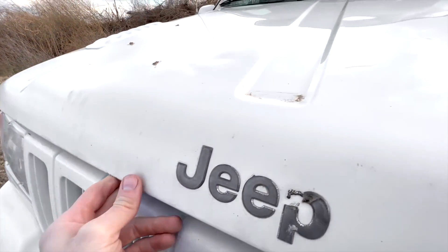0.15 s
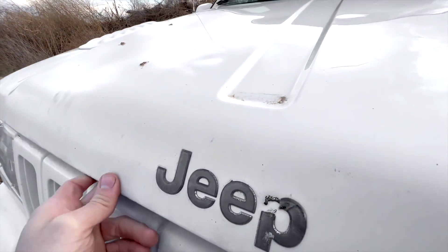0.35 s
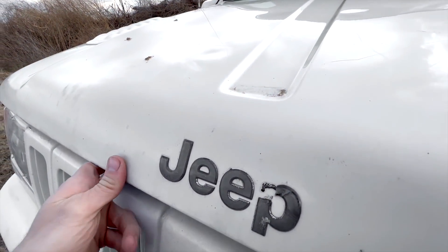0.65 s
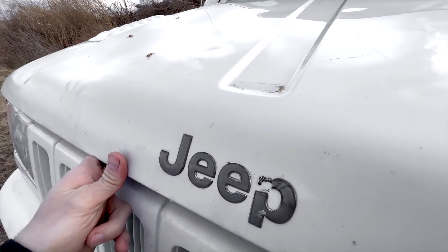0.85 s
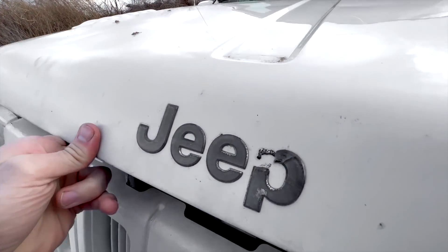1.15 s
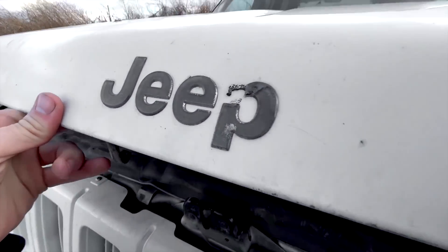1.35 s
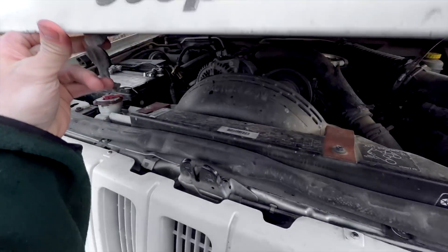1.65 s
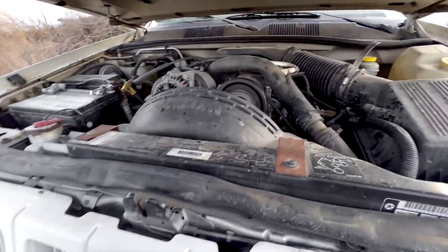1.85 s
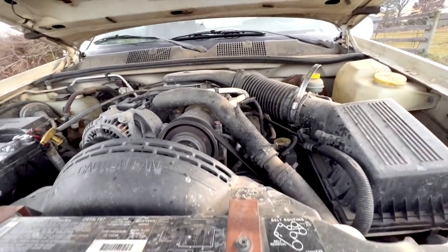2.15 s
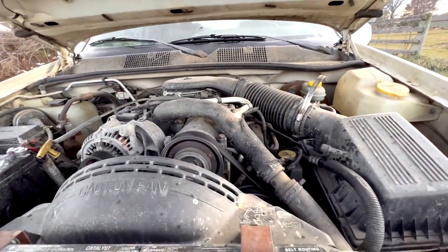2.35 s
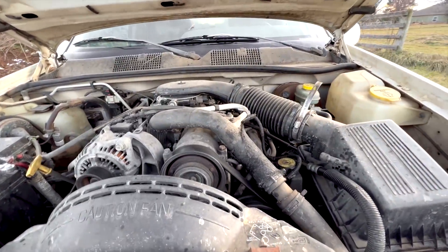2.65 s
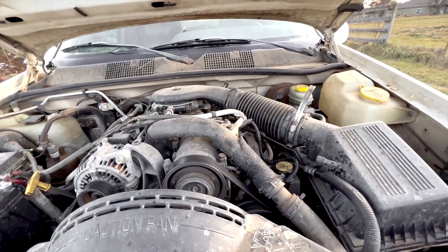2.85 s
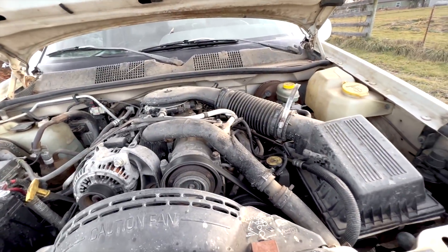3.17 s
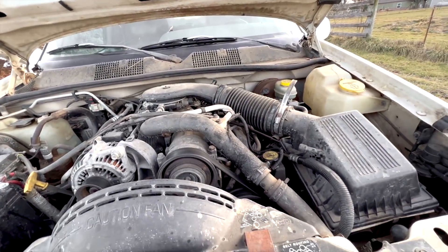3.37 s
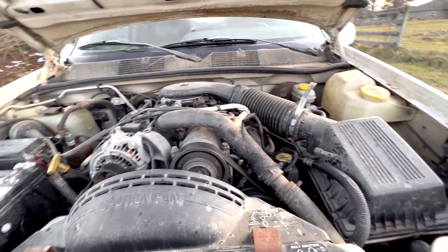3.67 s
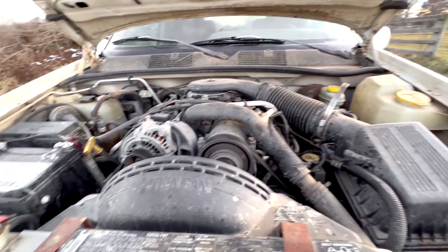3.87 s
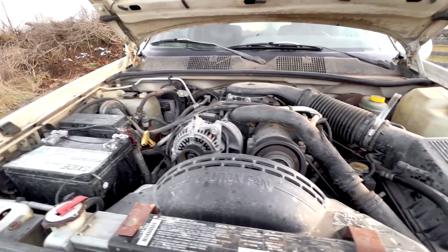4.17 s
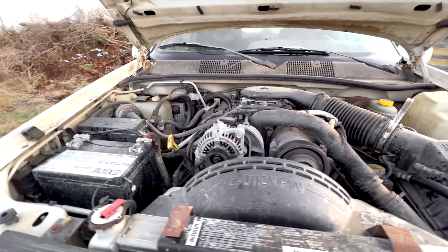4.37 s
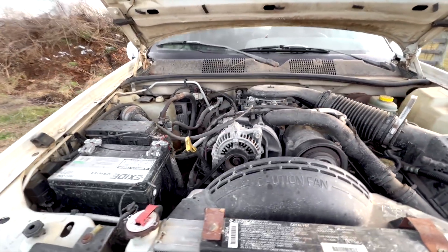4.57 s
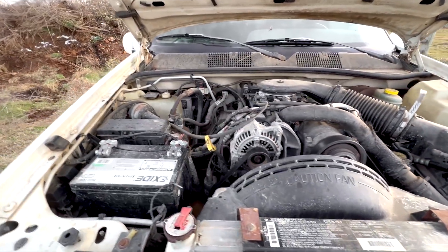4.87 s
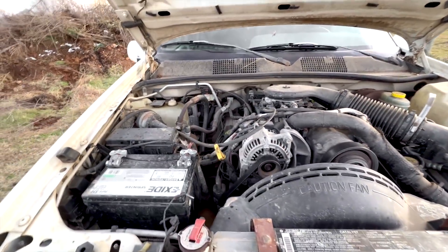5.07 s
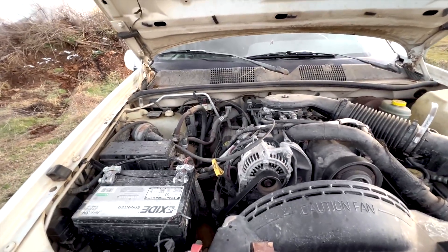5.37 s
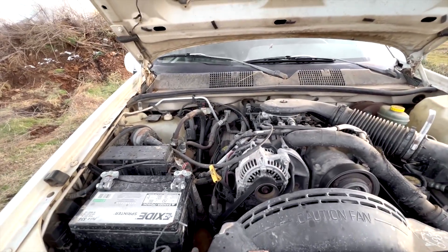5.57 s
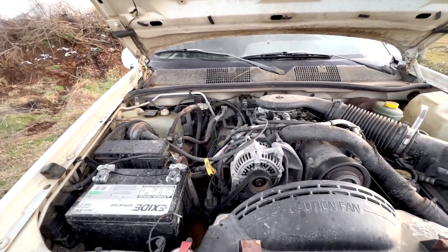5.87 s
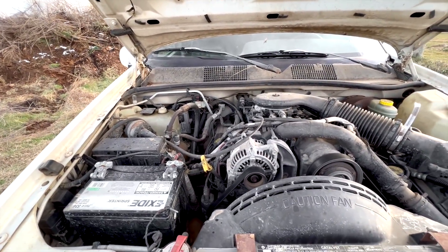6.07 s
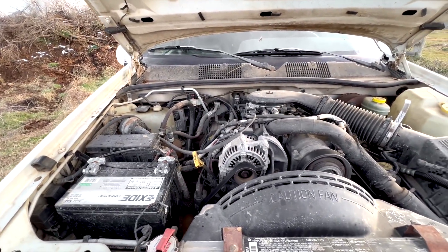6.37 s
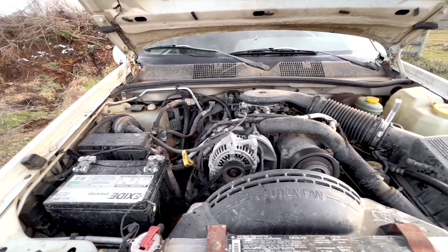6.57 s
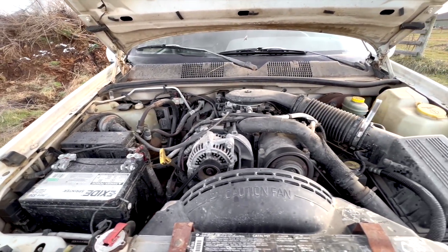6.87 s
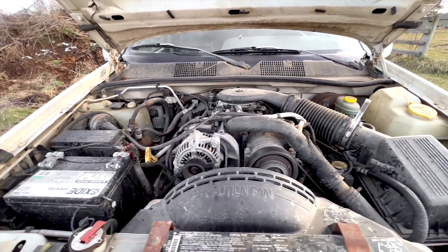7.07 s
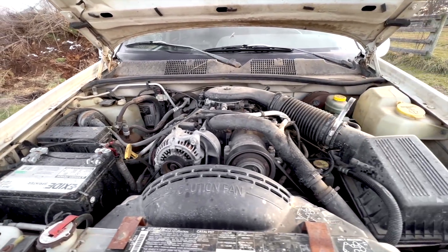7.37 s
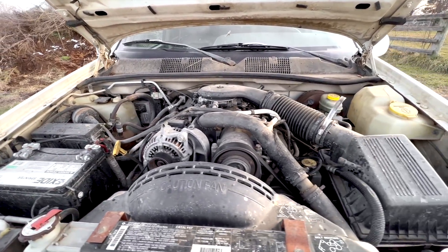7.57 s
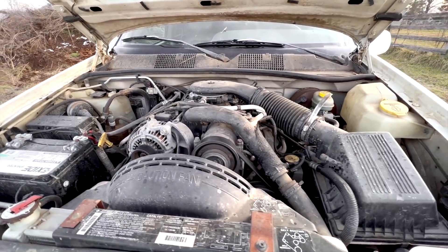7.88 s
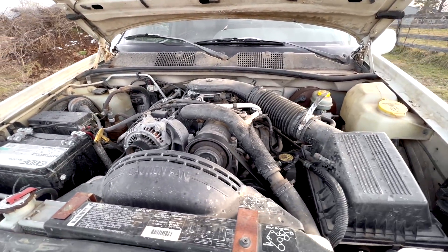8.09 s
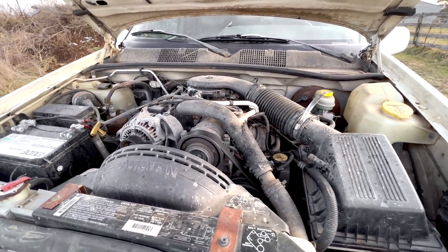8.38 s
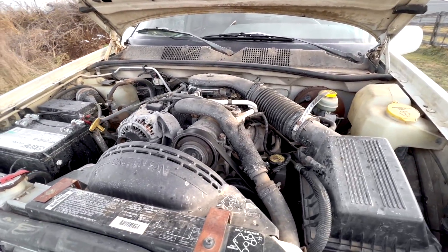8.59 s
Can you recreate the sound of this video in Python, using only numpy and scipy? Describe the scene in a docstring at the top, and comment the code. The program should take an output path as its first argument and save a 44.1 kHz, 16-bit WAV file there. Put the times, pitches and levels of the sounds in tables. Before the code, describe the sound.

A big petrol engine idles with an uneven lope while a worn belt squeals constantly and a bonnet catch clunks and squeaks open.

```python
"""In a field, a petrol V8 idles, heard from in front of the grille while its bonnet is unlatched and raised.
The exhaust lopes as uneven firing pulses ring pipes and block; noise throbbing with the engine gives fan,
covers and rumble. A worn drive belt squeals without pause as a wavering tone over gritty hiss, and its
scuffed patches come round with every lap. It hoots, chirps and ticks besides.
The catch squeaks as short tones and clunks as padded knocks that ring the bonnet sheet."""
import sys
import numpy as np
from scipy import signal
from scipy.fft import rfft, irfft, next_fast_len
from scipy.io import wavfile

SR = 44100
rng = np.random.default_rng(int(sys.argv[2]) if len(sys.argv) > 2 else 0)


def master(y):
    """Save y as 16-bit WAV."""
    cut = np.clip(np.atleast_2d(y).T, -1, 1)
    pcm = np.round(cut * 32767)  # scale
    wavfile.write(sys.argv[1], SR, pcm.astype(np.int16))


N = 384993   # length in samples

# The idle hunts a little. Each row: time in seconds, crank speed in rpm.
IDLE_SPEED = [(0, 691.7), (.57, 713.3), (1.28, 703.0), (4.07, 709.1), (4.44, 699.3), (6.48, 706.2),
              (8.73, 700.5)]
# Likeness of the two channels in every noise. Each row: frequency in Hz, correlation (held within -1 to 1).
CHANNEL_LIKENESS = [(60, 0.61), (130, 1), (290, 0.76), (640, 0.38), (1400, -0.031), (3100, -0.11),
                    (8000, -0.38), (9900, -0.11), (11600, -0.26), (12700, 1), (14000, -2.7), (15300, .1)]

# Cylinders in firing order. Each row: relative pulse level in dB, how early the pulse arrives
# as a share of the bank lead (0 = far bank, 1 = near bank).
CYLINDERS = [(14.5, 1), (17.5, 0.113), (11, 0.82), (-3.5, 0.4), (12.5, 0.0069), (16, 0.9), (17.5, 0.18),
             (9.5, 0)]
FIRST_FIRING_CYCLES, BANK_LEAD_CYCLES = .779, .027   # in engine cycles
# Exhaust pipe resonances. Each row: frequency in Hz, width in Hz, relative level in dB.
PIPE_MODES = [(63.52, 5.63, 2), (85.9, 5.33, 1.5), (141.5, 3, -11), (155.2, 4.2, -19.5)]
# Engine block resonances. Each row: frequency in Hz, width in Hz, relative level in dB.
BLOCK_MODES = [(245, 4.3, 2.5), (354, 57, -1), (394, 8, 3.5), (446.5, 5, 9)]

# Where in each cycle the engine shakes its mounts hardest.
# Each row: place in cycles, half width in cycles, relative strength.
MOUNT_SHAKES = [(.155, 0.072, 0.67), (.36, 0.033, 1.4), (.88, 0.051, 0.3)]
# Colour of the block rumble. Each row: frequency in Hz, relative level in dB.
RUMBLE_COLOUR = [(20, -10), (40, 3.5), (110, 3), (160, 4.5), (210, -8), (270, -8.5), (330, -7), (480, -9.5),
                 (700, -32.5), (1500, -52)]
# Colour of the fan and valve gear. Each row: frequency in Hz, relative level in dB.
WHIRR_COLOUR = [(200, -31), (450, 3.5), (650, -0.5), (900, 0.5), (1300, 2), (1800, -3), (2500, -9.5),
                (3500, -15), (6000, -30), (15000, -34.5)]
# Resonances of fan shroud and engine covers. Each row: frequency in Hz, width in Hz, relative level in dB.
COVER_MODES = [(393, 79, 7), (452, 65, 9), (792, 51, 2.5), (1091, 16, 9), (1293, 33, 8.5), (1557, 44, 3.5)]
# less of the rumble from the grille arrives as the microphone rises over the engine
RUMBLE_DB, RUMBLE_LOSS_DB = -27.5, 11
RISE_START_S, RISE_LENGTH_S = 1.92, 3.7

BELT_LAPS, PULLEY_TURNS = .2482, 2.423   # per engine cycle
# Where the belt sets its free span hooting. Each row: place in laps, half width in laps, relative level in dB.
HOOT_PLACES = [(0.031, 0.048, -6), (0.188, 0.019, -4), (.49, 0.012, -11), (.55, .028, -0.5),
               (0.687, 0.022, -8), (0.814, 0.01, -8), (0.924, 0.019, -11.5)]
# Sharp ticks of the belt catching. Each row: time in seconds, onset level in dB before the noise shapes it.
BELT_TICKS = [(0.841, -17), (4.224, -14), (4.277, -15), (5.343, -16.5), (5.603, -11), (6.975, -9.5),
              (7.15, -39), (8.157, -14)]

# Knocks of hand and catch on the bonnet. Each row: time in seconds, blow strength in dB before padding.
BONNET_KNOCKS = [(.798, -18.5), (1.192, -22), (1.214, -18), (1.368, -14.5), (1.383, -13.5), (1.402, -21),
                 (1.718, -23), (1.91, -20), (1.935, -23), (3.044, -24)]
# Bonnet sheet modes. Each row: frequency in Hz, relative level in dB, t60 in seconds.
SHEET_MODES = [(185, -13, .12), (242, -7, .14), (322, -9, .14), (410, -3, .17), (452, -3, .16),
               (520, -10, .08), (640, -20, .05), (1120, -14, .08), (1545, -13, .05)]
# Dry squeaks of catch and hinges. Each row: time in seconds, half length in seconds,
# centre pitch in Hz, fundamental in dB and octave in dB before the reflections.
CATCH_SQUEAKS = [(1.193, 0.0043, 1800, -39, -27), (1.331, 0.0054, 1823, -30, -25.5),
                 (1.362, 0.011, 1830, -27.5, -17), (2.391, 0.0086, 1548, -32, -56.5),
                 (2.472, .013, 1452, -30.5, -55)]
# the shut bonnet holds back the belt's hiss until it is lifted
LIFT_START_S, LIFT_LENGTH_S, BONNET_LOSS_DB = 1.04, 0.65, 9.5

# Worn patches along the belt. Each row: place in laps, nominal half width in laps,
# nominal scuff in dB, nominal fall of squeal pitch in Hz.
WORN_PATCHES = [(0.018, .014, 11.5, 337), (.091, 0.032, -1, 304), (.173, .0085, 13.5, 620),
                (0.206, .012, -2, 289), (0.294, 0.0076, 7.5, 402), (.352, .012, -9, 192),
                (0.394, 0.014, 5.5, 431), (0.464, 0.018, 4.5, 423), (.521, .016, 12, 298),
                (.559, .014, -2, 281), (.63, .012, 6, 356), (0.671, .007, 12.5, 560.2),
                (0.734, .018, 2.5, 310), (.791, .009, 6, 425), (.84, .014, -18, 193), (.897, .008, 11, 550),
                (0.921, .015, -4.5, 249), (0.967, .021, 1.5, 337)]
# Colour of rubber rubbing on steel. Each row: frequency in Hz, relative level in dB.
RUB_COLOUR = [(2000, -38), (3000, -3), (3800, -7.5), (4800, -1), (5500, -14), (5900, -39), (6500, 15),
              (7500, 2), (8800, 4), (10000, -19), (11200, 4.5), (13100, -1), (14200, 4.5), (15700, -20)]
# How far the rubbing leans left. Each row: frequency in Hz, left minus right in dB.
RUB_LEAN = [(3000, 1), (4200, -1), (5500, 18), (6700, 12), (7800, 12), (9000, -6), (15000, 2.5)]
# Resonances of the pulleys. Each row: frequency in Hz, width in Hz, relative level in dB.
PULLEY_MODES = [(4025, 300, -10.5), (4540, 580, -7.5), (5180, 180, -11), (5340, 92, -7), (6670, 960, -22),
                (12210, 310, -6.5)]
# The squeal swells and slackens. Each row: time in seconds, level in dB before the trim.
SQUEAL_LEVEL = [(0.0, -28.5), (1.29, -25.5), (1.34, -20), (2.84, -20.5), (3.4, -24), (6.15, -20.5),
                (7.07, -26.5), (7.1, -22.5), (8.73, -23.5)]
SQUEAL_TRIM_DB = -1.12

PEAK_LIMIT, CUTOFF_HZ = .92, 15750   # where rounded peaks level off, before the treble cut


def from_db(db):
    """Turn dB into an amplitude factor."""
    return 10 ** (np.asarray(db) / 20)


def rms_one(x):
    """Scale to an rms of 1."""
    return x / np.sqrt(np.mean(x ** 2) + 1e-20)


def in_time(rows):
    """Each column of a curve, sample by sample."""
    s, *columns = np.transpose(rows)
    return [np.interp(np.arange(N) / SR, s, c) for c in columns]


def at_hz(points, hz):
    """Read a spectrum on a log-frequency axis."""
    points = np.array(points)
    return np.interp(np.log(hz + 1), np.log(points[:, 0]), points[:, 1])


def fading(start_db, loss_db_per_s):
    """A level in dB that sinks at a steady rate."""
    return start_db - loss_db_per_s * np.arange(N) / SR


def travel(start_s, length_s):
    """How far a steady movement has got, from 0 to 1."""
    return np.clip((np.arange(N) / SR - start_s) / length_s, 0, 1)


def lean(left_db):
    """Left and right gains for a level difference."""
    return from_db(np.array([[.5], [-.5]]) * left_db)


def drift(rate_hz):
    """Random wander of rms 1, mostly slower than the given rate."""
    size = next_fast_len(N, True)
    hz = np.fft.rfftfreq(size, 1 / SR)
    slowed = rfft(rng.standard_normal(size)) / (1 + (hz / rate_hz) ** 2)
    return rms_one(irfft(slowed, size)[:N])


def noise(colour, balance=((1000, 2),)):
    """Stereo noise of a given colour, its channels mixed from mid and side to the set likeness."""
    size = next_fast_len(N, True)
    hz = np.fft.rfftfreq(size, 1 / SR)
    mid, side = rfft(rng.standard_normal((2, size)))
    alike = np.clip(at_hz(CHANNEL_LIKENESS, hz), -1, 1)
    pair = np.sqrt(1 + alike) * mid + np.sqrt(1 - alike) * side * [[1], [-1]]
    coloured = pair * from_db(at_hz(colour, hz)) * lean(at_hz(balance, hz))
    return rms_one(irfft(coloured, size)[:, :N])


def resonate(x, modes):
    """Parallel two-pole resonances of alternating sign, scaled together to rms 1."""
    out = 0
    for k, (hz, width_hz, db) in enumerate(modes):
        r = np.exp(-np.pi * width_hz / SR)
        gain = (-1) ** k * from_db(db) * (1 - r * r)
        poles = [1, -2 * r * np.cos(2 * np.pi * hz / SR), r * r]
        out = out + gain * signal.lfilter([1, 0, -1], poles, x)
    return rms_one(out)


def bump(turns, place, width):
    """A smooth swell that comes round at the same place in every turn."""
    away = turns - place
    away = away - np.round(away)
    return np.exp(-.5 * np.minimum((away / width) ** 2, 50))


def bay(x, t60, left_direct_db, right_direct_db):
    """Direct sound plus dense short reflections between engine, wings and bonnet."""
    t = np.arange(SR // 20) / SR
    echoes = rng.standard_normal((2, len(t))) * from_db(-60 * t / t60) * (t > .0005)
    echoes /= np.sqrt(np.sum(echoes ** 2, axis=1, keepdims=True))
    echoes[:, 0] = from_db([left_direct_db, right_direct_db])   # direct level against the echoes
    echoes /= np.sqrt(np.sum(echoes ** 2, axis=1, keepdims=True))
    return signal.oaconvolve(x[None], echoes, axes=1)[:, :N]


def machinery(cycles, rumble_db, whirr_db, covers_db=-3.0):
    """Block rumble and ringing covers pulse with the shakes; the fan's whirr throbs with the firings."""
    firing = 1 + 0.1 * np.cos(2 * np.pi * (len(CYLINDERS) * cycles - .15))
    shaking = sum(strength * bump(cycles, place, width) for place, width, strength in MOUNT_SHAKES)
    lope = rms_one(firing * (1 + shaking))
    rumble = from_db(rumble_db) * noise(RUMBLE_COLOUR)
    covers = from_db(whirr_db + covers_db) * resonate(noise(WHIRR_COLOUR), COVER_MODES)
    whirr = from_db(whirr_db) * noise(WHIRR_COLOUR, balance=((300, 6.5), (1200, 1.7), (3000, 0.38)))
    return lope * (rumble + covers) + rms_one(firing) * whirr


def exhaust(cycles, uneven_db=0.94, block_db=-33):
    """One pulse per firing into pipes and block; one bank's pulses arrive a little early."""
    run_in = SR // 2   # half a second lets the resonances build up first
    cycles = np.r_[np.arange(-run_in, 0) * cycles[0], cycles]
    pulses = np.zeros(len(cycles))
    for k, (db, bank) in enumerate(CYLINDERS):
        offset = FIRST_FIRING_CYCLES + k / len(CYLINDERS) - bank * BANK_LEAD_CYCLES
        firings = np.flatnonzero(np.diff(np.floor(cycles - offset)))
        pulses[firings] += from_db(db + uneven_db * rng.standard_normal(len(firings)))
    radiated = signal.sosfilt(signal.butter(4, 55, "high", fs=SR, output="sos"), pulses)
    pipes = resonate(radiated, PIPE_MODES)
    block = from_db(block_db) * resonate(radiated, BLOCK_MODES)
    return (pipes + block)[run_in:]


def chirps(cycles):
    """A pulley chirps once a turn, most when a surge of the crankshaft falls on it."""
    pulley = 0.085 + bump(cycles * PULLEY_TURNS, 0.13, 0.22)
    surge = 0.3 + bump(2 * cycles, 0.27, 0.17)   # once per crank turn
    scrape = pulley * surge * noise([(2500, -7), (3700, 5), (5000, -16)])
    return resonate(scrape, [(3615, 160, 0), (4180, 650, -1)]) * lean(0.89)


def hoots(cycles, hoot_hz=1100, wander_hz=17, rough_hz=35):
    """The free belt span hums faintly, swelling at set places in each lap on a wandering note."""
    laps = cycles * BELT_LAPS
    drive = 0.051 + sum(from_db(db) * bump(laps, place, width) for place, width, db in HOOT_PLACES)
    pitch_hz = hoot_hz + wander_hz * drift(9.3) + rough_hz * drift(183)
    strength = drive * from_db(2.4 * drift(1.5) + 3.7 * drift(60))
    hum = strength * np.sin(2 * np.pi * np.cumsum(pitch_hz) / SR)
    return rms_one(bay(hum, 0.007, 6.4, 3.4)) * lean(4.1)


def ticks(decay_s=0.0032):
    """The belt catches with a sharp crack of rubbing noise that dies exponentially."""
    blows = np.zeros(N)
    for s, db in BELT_TICKS:
        blows[round(s * SR)] = from_db(db)
    envelope = signal.lfilter([1], [1, -np.exp(-1 / (decay_s * SR))], blows)
    return envelope * noise(RUB_COLOUR, RUB_LEAN)


def knocks(crack_db=-24, crack_s=0.0095, contact_hz=620):
    """Low-passed, padded blows ring the decaying modes of the sheet steel with a short noisy crack."""
    blows, ring, age = np.zeros(N), 0, np.arange(SR // 2) / SR
    for s, db in BONNET_KNOCKS:
        blows[round(s * SR)] = from_db(db)
    padding = signal.butter(2, contact_hz, fs=SR, output="sos")
    blows = signal.sosfilt(padding, blows + 1e-18)
    for hz, db, t60 in SHEET_MODES:
        decay = np.exp(-np.log(1000) * age / t60)
        ring = ring + from_db(db) * np.sin(2 * np.pi * hz * age) * decay
    ring = ring + from_db(crack_db) * rng.standard_normal(len(age)) * np.exp(-age / crack_s)
    return signal.oaconvolve(blows, ring)[:N]


def squeaks(waver_depth=0.0297):
    """Catch and hinges squeak as they slide: brief wavering tones with an octave above."""
    t, out = np.arange(N) / SR, np.zeros(N)
    waver = 1 + waver_depth * drift(340)
    for s, half_s, hz, db, octave_db in CATCH_SQUEAKS:
        phase = 2 * np.pi * np.cumsum(hz * waver) / SR
        tone = from_db(db) * np.sin(phase) + from_db(octave_db) * np.sin(2 * phase)
        out += bump(t / t[-1], s / t[-1], half_s / t[-1]) * tone
    return out


def bonnet():
    """Knocks and squeaks reach the ear with the short reflections of the engine bay."""
    return bay(knocks() + squeaks(), .02, 12, 10)


def belt_contact(cycles, vary_db=1.44):
    """How hard the belt scuffs, and how far its squeal is pulled down, as the patches pass the pulley."""
    laps = cycles * BELT_LAPS
    scuff, sag_hz = np.zeros(N), np.zeros(N)
    for place, width, db, fall_hz in WORN_PATCHES:
        away = (laps - place + .5) % 1 - .5
        near = np.flatnonzero(np.abs(away) < 5 * width)
        # a patch bites quickly and lets go slowly, a little differently on every lap
        passing = bump(away[near], 0, width * np.where(away[near] < 0, .8, 1.15))
        lap_bites = from_db(vary_db * rng.standard_normal(int(laps[-1]) + 3))
        bite = lap_bites[np.round(laps[near] - place).astype(int)]
        scuff[near] += from_db(db) * bite * passing
        sag_hz[near] += fall_hz * np.sqrt(bite) * passing
    return scuff, sag_hz


def rubbing(cycles, scuff, smooth=1.5, grain_db=1.0, patchy_db=5.0, ring_db=-9):
    """Gritty hiss of rubber on steel, swelling with the scuff of each worn patch and ringing the pulleys."""
    tug = 1 + 0.088 * np.cos(2 * np.pi * (len(CYLINDERS) * cycles - .12))
    grip = smooth + 4 * np.tanh(scuff / 4)   # friction saturates
    force = grip * tug * from_db(grain_db * drift(700))
    rest, hiss = noise(RUB_COLOUR, RUB_LEAN), 0
    for edge_hz in np.geomspace(4200, 13000, 6):
        band = signal.sosfiltfilt(signal.butter(4, edge_hz, fs=SR, output="sos"), rest)
        hiss = hiss + band * from_db(patchy_db * drift(23))   # each band flares on its own
        rest = rest - band
    rings = 0
    for hz, width_hz, db in PULLEY_MODES:
        drive = force ** 1.5 * from_db(4.5 * drift(25)) * rng.standard_normal(N)
        narrow = resonate(drive, [(hz, width_hz, 0)])
        rings = rings + from_db(db) * resonate(narrow, [(hz, 4 * width_hz, 0)])
    return rms_one(force * (hiss + rest)) + from_db(ring_db) * bay(rings, 0.072, 12.0, 0) * lean(6.4)


def squeal(cycles, scuff, sag_hz, free_hz=6950, grip_hz=200, tear_hz=100, tug_hz=70, skate_hz=340,
           flicker_db=2.5, octave_db=-19):
    """Stick-slip whistle: clear where the belt grips, higher and raspy where it skates, torn by hard scuffs."""
    grip = np.tanh(sag_hz / grip_hz)
    tug = np.cos(2 * np.pi * (len(CYLINDERS) * cycles - .1))   # each firing tugs the belt
    flutter_hz = 65 * drift(51.2) - tug_hz * tug + skate_hz * (1.45 - grip) * drift(1202)
    # the harder a patch scuffs, the more the pitch is torn; the faintest patches leave it whole
    torn_hz = tear_hz * np.maximum(scuff - 1, 0) * (drift(500) - .5)
    phase = 2 * np.pi * np.cumsum(free_hz - sag_hz + flutter_hz + torn_hz) / SR
    strength = (0.97 + grip) * from_db(1.0 * tug + flicker_db * drift(89) + 1.7 * drift(300))
    tone = rms_one(bay(strength * np.sin(phase), .026, 4, -4)) * lean(10.5)
    octave = rms_one(bay(strength * np.sin(2 * phase), 0.0048, -16, -25))
    return tone + from_db(octave_db) * octave


def scene():
    """The crankshaft times engine and belt; bonnet and moving microphone shape how loud parts arrive."""
    cycles = np.cumsum(in_time(IDLE_SPEED)[0]) / (2 * 60 * SR)   # two crank turns make one engine cycle
    risen = travel(RISE_START_S, RISE_LENGTH_S)
    shut = 1 - travel(LIFT_START_S, LIFT_LENGTH_S)
    scuff, sag_hz = belt_contact(cycles)
    # exhaust, whirr, hoots and rubbing fade steadily as the microphone draws back
    engine = machinery(cycles, RUMBLE_DB - RUMBLE_LOSS_DB * risen, fading(-35.5, loss_db_per_s=0.49))
    pipe = from_db(fading(-10, loss_db_per_s=0.94)) * exhaust(cycles) * lean(1.0)
    chirping = from_db(-40) * chirps(cycles)
    hooting = from_db(fading(-37.5, loss_db_per_s=0.8)) * hoots(cycles)
    hiss_db = fading(-21, loss_db_per_s=0.92) - BONNET_LOSS_DB * shut
    hiss = from_db(hiss_db) * rubbing(cycles, scuff)
    whistle = from_db(in_time(SQUEAL_LEVEL)[0] + SQUEAL_TRIM_DB) * squeal(cycles, scuff, sag_hz)
    return engine + pipe + chirping + hooting + ticks() + bonnet() + hiss + whistle


def record(dry):
    """The highest peaks are rounded and the top is cut steeply."""
    rounded = dry / (1 + (dry / PEAK_LIMIT) ** 10) ** .1
    return signal.sosfilt(signal.ellip(12, .1, 90, CUTOFF_HZ, fs=SR, output="sos"), rounded)


dry = scene()
out = record(dry)
master(out)
```